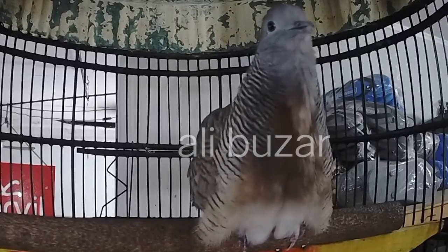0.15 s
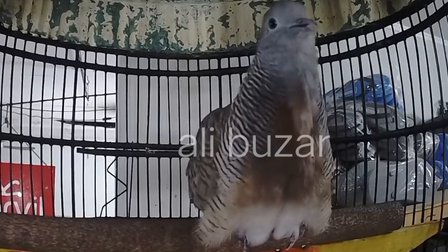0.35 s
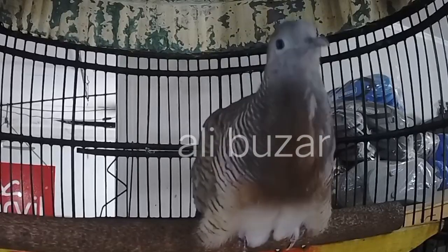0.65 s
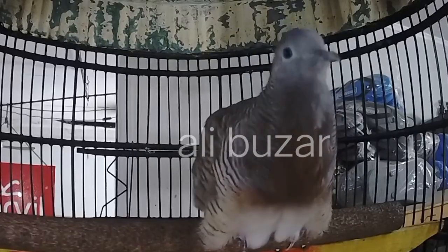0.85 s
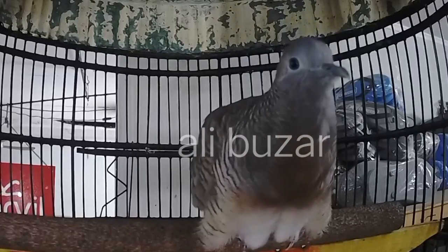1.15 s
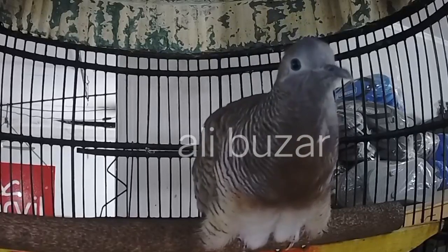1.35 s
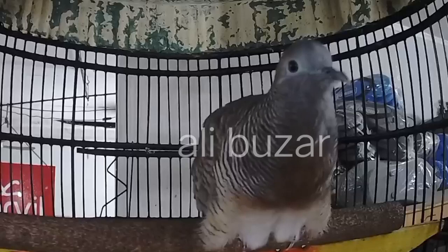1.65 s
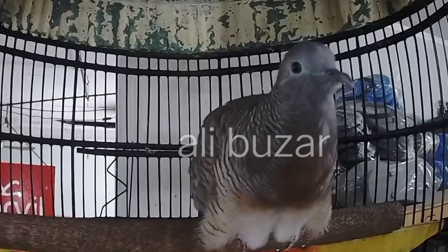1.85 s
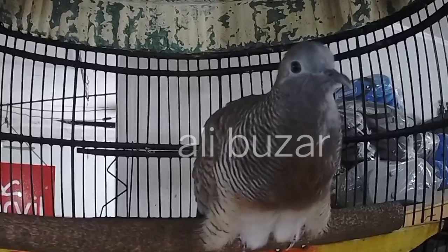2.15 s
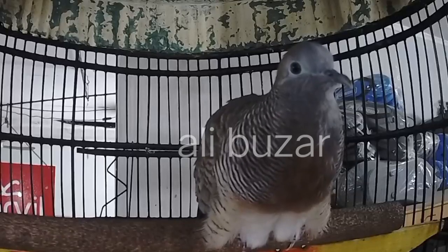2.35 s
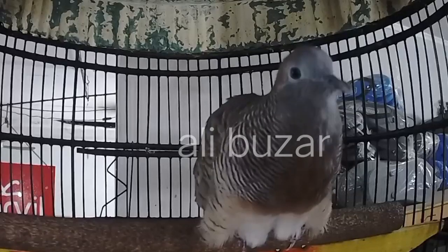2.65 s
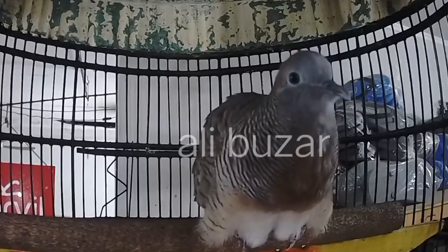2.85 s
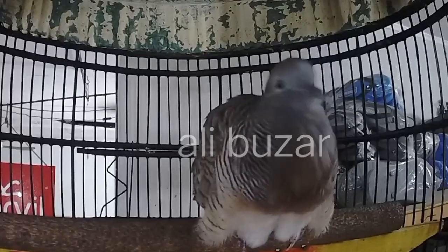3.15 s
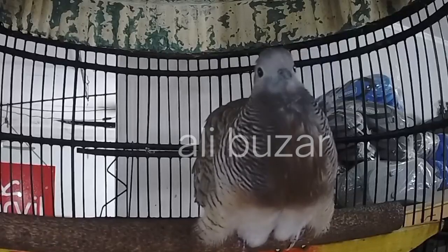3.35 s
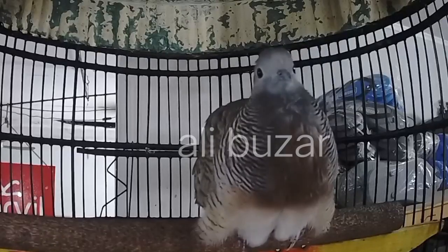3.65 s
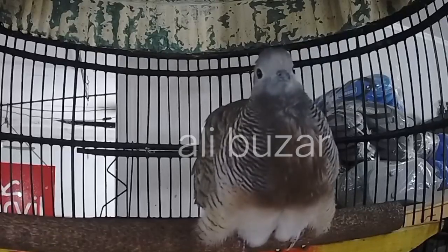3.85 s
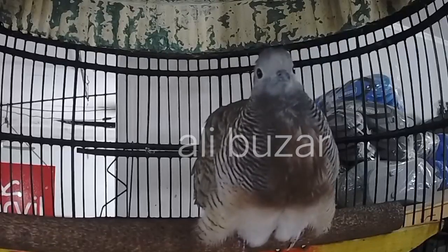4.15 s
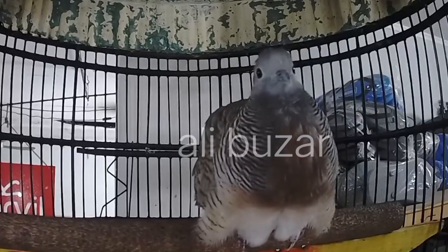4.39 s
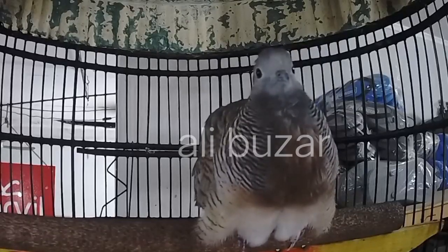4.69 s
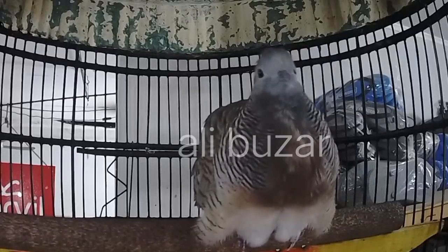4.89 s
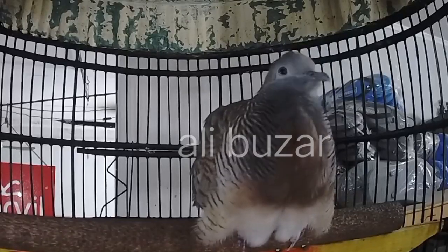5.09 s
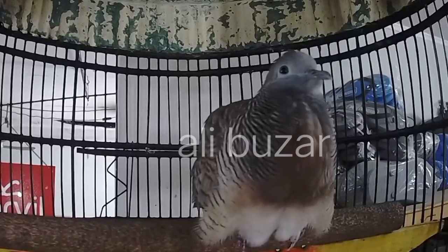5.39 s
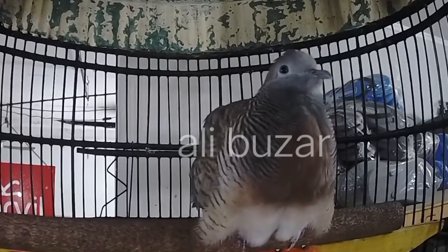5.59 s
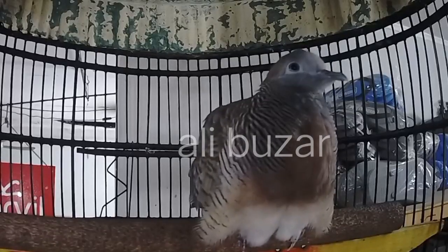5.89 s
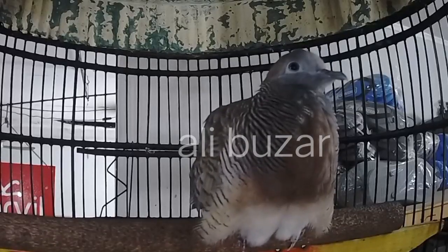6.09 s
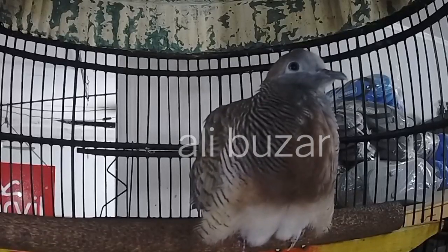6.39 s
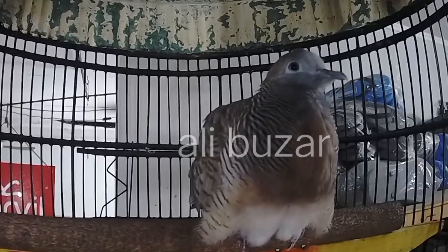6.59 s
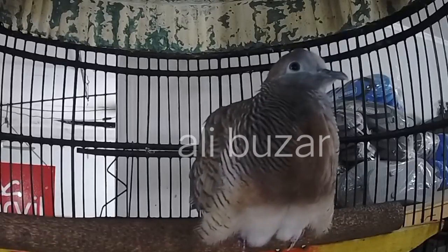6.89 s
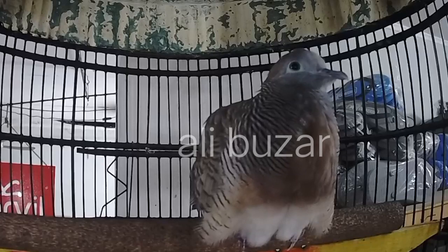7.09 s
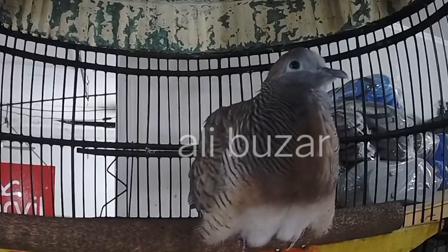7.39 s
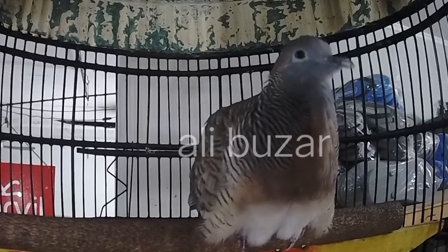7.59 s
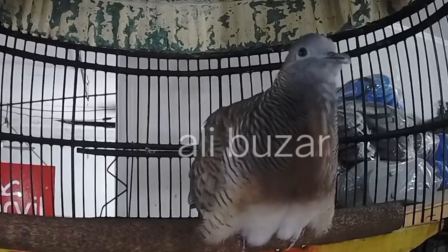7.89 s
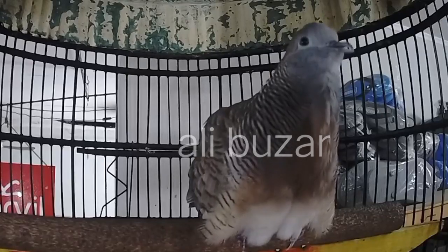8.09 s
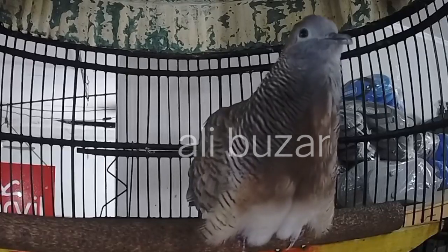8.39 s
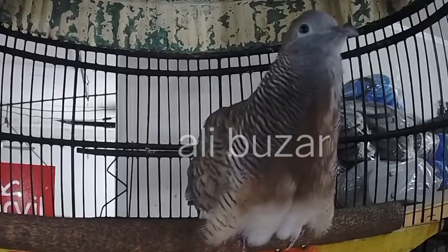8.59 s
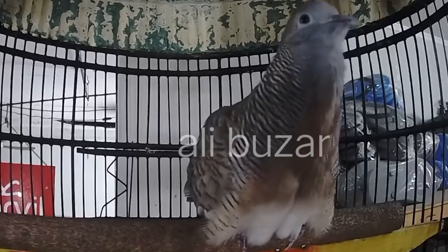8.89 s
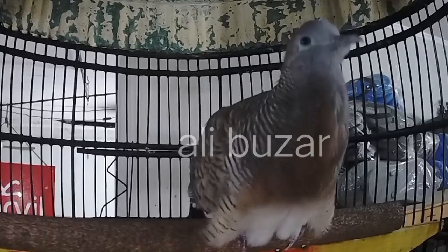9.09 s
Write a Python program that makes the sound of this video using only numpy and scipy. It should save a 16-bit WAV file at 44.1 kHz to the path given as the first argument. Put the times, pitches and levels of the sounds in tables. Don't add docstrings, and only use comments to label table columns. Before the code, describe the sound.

A caged dove coos close by in soft pure notes, neighbouring doves trill and call, over low traffic rumble and an engine pulling nearby.

```python
import sys
import numpy as np
from scipy import signal
from scipy.fft import rfft, irfft, next_fast_len
from scipy.io import wavfile
from scipy.ndimage import uniform_filter1d, map_coordinates

SR = 44100
rng = np.random.default_rng(int(sys.argv[2]) if len(sys.argv) > 2 else 0)


def output_pcm(signal):
    pcm = np.clip(np.atleast_2d(signal).T, -1, 1) * 32767
    wavfile.write(sys.argv[1], SR, np.round(pcm).astype(np.int16))


def volts(x):
    e = np.asarray(x, float) / 20
    return 10 ** e


N = 407475
T = np.arange(N) / SR


def unit(x):
    return x / np.sqrt(np.mean(x ** 2) + 1e-20)


def wobble(rate_hz, t=T):
    knots = rng.standard_normal(int(len(t) * rate_hz / SR) + 4)
    return map_coordinates(knots, [t * rate_hz])


def add(out, start_s, sound):
    first = round(start_s * SR)
    part = out[max(first, 0):][:len(sound) + min(first, 0)]
    sound = sound[max(-first, 0):]
    part += sound[:len(part)]


def tone(hz, db, overtones=(), bright_db=0, high_share=1):
    phase = 2 * np.pi * np.cumsum(hz) / SR
    wave = np.sin(phase)
    for k, gain_db in overtones:
        share = np.where((bright_db > 0) & (k > 3), high_share, 1)
        lift_db = bright_db / np.sqrt(k - 1) * share
        patchy_db = 2.5 * wobble(25, T[:len(phase)]) - 2.5
        wave = wave + volts(gain_db + lift_db + patchy_db) * np.sin(k * phase)
    return np.sqrt(2) * volts(db) * wave


def fade(t, length_s, attack_s, release_s):
    opening = np.clip(t / attack_s, 0, 1)
    closing = np.clip((length_s - t) / release_s, 0, 1)
    return np.sin(np.pi / 2 * opening * closing) ** 2


def catch(low_hz, high_hz, length_s, db):
    t = np.arange(round(length_s * SR)) / SR
    hz = low_hz + (high_hz - low_hz) * t / length_s
    second = tone(hz * rng.uniform(0.61, 0.88), db + 5.5)
    return (tone(hz, db) + second) * np.sin(np.pi * t / length_s)


def arches(notes, rise_s, dwell, dip, sag, overtones, throat, catch_db):
    out = np.zeros(N)
    centre_hz, width_hz, throat_db = throat
    last_end_s = 0
    for start_s, length_s, top_hz, db in notes:
        t = np.arange(round(length_s * SR)) / SR
        joined = start_s - last_end_s < .004
        climb = (dip - 0.15 * joined) * np.exp(-(t / rise_s) ** dwell)
        fall = sag * np.exp((t - length_s) / (0.0079 + 0.089 * length_s))
        hz = top_hz * (1 + sag / 8 - climb - fall)
        resonance = 1 / (1 + ((hz - centre_hz) / width_hz) ** 2)
        lift_db = throat_db * resonance * np.exp(-(t / (5.9 * rise_s)) ** 2)
        bright_db = 2.28 * lift_db - 90 * fall - 40 * climb
        note = tone(hz, db + lift_db - 22 * fall, overtones, bright_db, high_share=-.6)
        add(out, start_s, note * fade(t, length_s, attack_s=.0065, release_s=.010))
        add(out, start_s - .005, catch(1250, 1600, 0.0054, db + catch_db - 30 * joined))
        last_end_s = start_s + length_s
    return out


def echoes(x, t60_s, wall_s, wall_db, tail_db):
    t = np.arange(SR // 2) / SR
    tail = rng.standard_normal((2, len(t))) * volts(-60 * t / t60_s) * (t > .012)
    tail = volts(tail_db) * tail / np.linalg.norm(tail[0])
    tail[:, round(wall_s * SR)] += volts(wall_db)
    tail[1] = 0.83 * tail[0] + 0.1 * tail[1]
    return x + signal.fftconvolve(x[None], tail, axes=1)[:, :N]


def rush(spectrum, alike, patchy_db):
    z = signal.stft(rng.standard_normal((2, N + 512)), nperseg=512)[2]
    field = uniform_filter1d(rng.standard_normal(z.shape[1:]), size=6, axis=0)
    field = uniform_filter1d(field, size=10, axis=1)
    pair = signal.istft(z * volts(patchy_db * unit(field)), nperseg=512)[1]
    size = next_fast_len(N + 8192)
    hz, db = np.transpose(spectrum)
    colour = volts(np.interp(np.log(np.fft.rfftfreq(size, 1 / SR) + 1), np.log(hz + 1), db))
    turn = np.arccos(np.clip(alike, 0, 1)) / 2
    coloured = irfft(rfft(pair, size) * colour, size)[:, :N]
    mid, side = coloured * [[np.cos(turn)], [np.sin(turn)]]
    return unit(np.array([mid + side, mid - side]))


# (time [s], level [dB])
TRAFFIC_STRENGTH = [(0.0, -60), (0.79, -62.5), (1.34, -60), (2.21, -65), (2.68, -62), (3.22, -62),
                    (4.79, -55.5), (5.25, -51), (6.28, -54.5), (6.51, -56.5), (8.03, -57), (8.77, -52.5),
                    (9.24, -56)]
# (frequency [Hz], density [dB per Hz])
RUMBLE_SPECTRUM = [(20, -47.5), (33, -27.5), (50, -4.5), (119, -5.5), (214, -7), (330, -9), (400, -36.5),
                   (520, -46), (880, -120)]
TRAFFIC_SPECTRUM = [(210, -28), (350, -5.5), (764, -6.5), (853, -8.5), (1800, -22.5), (2340, -49),
                    (3960, -120)]
HISS_SPECTRUM = [(880, -30), (1500, -4), (2020, 1.5), (2400, 0.5), (3230, -10), (3860, -13), (5020, -42.5),
                 (8490, -120)]
RUSTLE_SPECTRUM = [(2500, -37), (4000, 2.5), (6500, -2.5), (9500, -5), (11000, -9), (13000, -14.5),
                   (15000, -23), (15400, -120)]
# (mean level [dB], growth with strength [dB per dB])
STREET_LAYERS = [
    (-33.5, .7),
    (-39, 0.46),
    (-52.5, 0.96),
    (-66, 0.61),
]
# (time [s], width [s], level [dB])
LEAF_GUSTS = [
    (.02, 0.22, 5),
    (3.78, 0.049, 8),
    (5.07, 0.048, 1.5),
    (8.9, .15, -1),
]


def street():
    strength_db = np.interp(T, *np.transpose(TRAFFIC_STRENGTH))
    swing_db = strength_db - strength_db.mean()
    rumble, traffic, hiss, rustle = (volts(db + grows * swing_db) for db, grows in STREET_LAYERS)
    gust_db = sum(db * np.exp(-((T - s) / width_s) ** 2) for s, width_s, db in LEAF_GUSTS)
    rumble = rumble * volts(1.6 * wobble(1.5))
    low = rumble * rush(RUMBLE_SPECTRUM, 0.99, patchy_db=1.0)
    low = low + traffic * rush(TRAFFIC_SPECTRUM, 1.0, patchy_db=2.0)
    hiss = hiss * volts(0.77 * gust_db)
    rustle = rustle * volts(gust_db + 1.5 * wobble(5.8) + [[-.8], [.8]])
    high = hiss * rush(HISS_SPECTRUM, 1.0, patchy_db=1.5)
    high = high + rustle * rush(RUSTLE_SPECTRUM, .1, patchy_db=0.5)
    return low + high + near_engine() + idle_engine()


# (time [s], firing rate [Hz], level [dB])
IDLE_RUN = [
    (0, 36.8, -34.5),
    (1.2, 37.39, -36.5),
    (2.3, 37.44, -36),
    (2.8, 36.17, -45.5),
]
# (multiple of firing rate, level [dB])
IDLE_HARMONICS = [(2, -10), (3, -15.5), (4, 4), (5, 2), (6, 1), (7, -9), (8, -5.5), (10, -15), (11, -17)]


def idle_engine():
    s, hz, db = np.transpose(IDLE_RUN)
    phase = 2 * np.pi * np.cumsum(np.interp(T, s, hz) * (1 + .004 * wobble(6))) / SR
    drone = np.zeros(N)
    for k, gain_db in IDLE_HARMONICS:
        drone += volts(gain_db + 3 * wobble(3)) * np.sin(k * phase + 2 * np.pi * rng.random())
    return unit(drone) * volts(np.interp(T, s, db, left=-90, right=-90))


def slide(start_s, length_s, from_hz, to_hz, db, peak):
    swell_db, die_db = 6, 15.5
    t = np.arange(round((length_s + .024) * SR)) / SR
    u = (t - .012) / length_s
    peak = np.clip(peak, .05, .95)
    curve_db = np.where(u < peak, swell_db / peak ** 2, die_db / (1 - peak) ** 2)
    level_db = db - curve_db * (u - peak) ** 2
    scoop = 1 - .05 * np.exp(-t / .012) + 0.0066 * wobble(40, t)
    hz = (from_hz + (to_hz - from_hz) * u) * scoop
    return start_s - .012, tone(hz, level_db) * fade(t, length_s + 0.019, attack_s=.022, release_s=0.025)


# (time [s], length [s], pitch [Hz], level [dB])
LEVEL_COOS = [(-.05, .13, 1145, -26.5), (-.01, 0.13, 949.5, -31), (0.106, 0.064, 893, -28),
              (.85, 0.046, 871, -23.5), (0.966, 0.092, 819, -28.5), (1.11, 0.15, 840, -22.5),
              (1.281, .06, 945, -28), (1.395, .05, 1058, -22.5), (2.12, 0.19, 1143, -32),
              (3.666, 0.072, 702, -38), (4.782, 0.056, 900, -24.5), (5.078, 0.05, 897, -24),
              (5.145, 0.038, 1065, -28), (5.255, 0.047, 893, -25), (6.35, 0.029, 946, -20),
              (6.49, 0.07, 862, -35), (6.716, 0.22, 898, -28.5), (8.97, 0.075, 870, -29.5),
              (9.1, 0.082, 860, -29), (9.203, 0.036, 882, -29.5)]
# (after [s], length [s], from [Hz], to [Hz], level [dB], loudest at [share])
QUESTION_NOTES = [
    (0, .11, 859.6, 978, -9.5, .65),
    (.06, .07, 1076, 1087, -12, .5),
    (.11, .09, 1058, 1015, -1.5, .45),
    (.19, .05, 1023, 1026, -11.5, .4),
]
# (time [s], pitch factor, level [dB])
QUESTION_STARTS = [
    (.68, 0.99, -18),
    (1.999, 0.98, -21.5),
    (6.31, 1.0, -22),
    (7.07, 1.0, -20),
    (8.769, 1.0, -19),
]
# (time [s], length [s], from [Hz], to [Hz], level [dB])
FAINT_WHISTLES = [
    (0.846, .13, 1934, 1915, -47),
    (1.203, 0.15, 1855, 1758, -38.5),
    (1.511, 0.28, 1708, 1750, -47.5),
    (1.885, .08, 1775, 1804, -51),
]
# (time [s], length [s], from [Hz], to [Hz], level [dB])
RISING_SLIDES = [
    (1.67, .16, 870, 921, -26.5),
    (4.53, .12, 871, 931, -27),
    (6.603, 0.088, 871, 897, -31),
]
# (after [s], pitch [Hz], level [dB])
ANSWER_ARCH = [
    (0, 814, -2),
    (.022, 854, 1),
    (.04, 1014, -2.5),
    (.11, 1020, 1.5),
    (.165, 968, -1),
    (.2, 900, -5.5),
    (.24, 820, -7),
]
# (after [s], length [s], from [Hz], to [Hz], level [dB], loudest at [share])
ANSWER_NOTES = [
    (.015, 0.092, 856, 864, -4, 0.13),
    (.21, .09, 925, 956, -8, .12),
    (.3, .11, 805, 815, -9.5, .2),
    (.44, .19, 843, 808.7, -2, 0.21),
]
# (time [s], pitch factor, level [dB])
ANSWER_STARTS = [
    (2.96, 0.99, -18),
    (5.825, 1.0, -17.5),
]


def far_birds():
    out = np.zeros(N)
    for s, length_s, hz, db in LEVEL_COOS:
        add(out, *slide(s, length_s, hz * (1 + 0.014), hz * (1 - 0.014), db, peak=.35))
    for phrase, starts in ((QUESTION_NOTES, QUESTION_STARTS), (ANSWER_NOTES, ANSWER_STARTS)):
        for s, factor, db in starts:
            for after_s, length_s, from_hz, to_hz, gain_db, peak in phrase:
                add(out, *slide(s + after_s, length_s, factor * from_hz, factor * to_hz, db + gain_db, peak))
    for row in FAINT_WHISTLES:
        add(out, *slide(*row, peak=0.13))
    for row in RISING_SLIDES:
        add(out, *slide(*row, peak=.7))
    after_s, arch_hz, arch_db = np.transpose(ANSWER_ARCH)
    t = np.arange(round((after_s[-1] + .024) * SR)) / SR
    for s, factor, db in ANSWER_STARTS:
        hz = factor * np.interp(t - .012, after_s, arch_hz)
        coo = tone(hz, db + np.interp(t - .012, after_s, arch_db))
        add(out, s - .012, coo * fade(t, t[-1], attack_s=0.066, release_s=0.029))
    flutter_db = 3.2 * wobble(55)
    return echoes(out * volts(flutter_db), t60_s=.42, wall_s=.045, wall_db=-18, tail_db=-8.5)


# (time [s], length [s], pitch [Hz], level [dB], slow climb [share])
NEAR_COOS = [
    (.553, 0.26, 742.6, -8, 0.036),
    (1.01, 0.11, 728, -8.5, 0.018),
    (1.256, .118, 722.6, -8.5, .01),
    (1.522, 0.14, 723, -8.5, 0.015),
    (1.822, 0.784, 712, -8.5, .01),
    (9.016, .33, 739.6, -8.5, 0.033),
]
# (multiple, level [dB])
NEAR_OVERTONES = [(2, -43.5), (3, -57.5), (4, -63), (5, -64), (6, -74), (8, -71.5)]
# (from [s], to [s], [(multiple, level [dB])])
HALF_ORDERS = (.725, .792, [(2.5, -46), (3, -48.5), (3.5, -51.5), (4, -51.5), (4.5, -56.5)])


def near_dove():
    sag_hz_per_s, sag_ends_s, climb_s = 105, 0.618, 0.033
    fade_db_per_s, tired_db, tires_s, tiring_s = 5.5, 3.2, .562, .008
    close_db_per_s, close_s = 752.5, 0.024
    doubling_from_s, doubling_to_s, half_overtones = HALF_ORDERS
    out = np.zeros(N)
    for start_s, length_s, hz, db, climb in NEAR_COOS:
        t = np.arange(round(length_s * SR)) / SR
        flick = 0.11 if length_s > .4 else -.09
        closing = np.exp((t - length_s) / 0.017) * flick
        scoop = 1 - 0.22 * np.exp(-t / .008) - 2 * climb * np.exp(-t / climb_s) + closing
        sagging_hz = hz - sag_hz_per_s * np.minimum(t - .06, sag_ends_s)
        pitch_hz = sagging_hz * scoop * (1 + 0.0033 * wobble(22, t))
        level_db = db - fade_db_per_s * t - tired_db / (1 + np.exp((tires_s - t) / tiring_s))
        shut_db = close_db_per_s * np.maximum(t - length_s + close_s * (length_s < .4), 0)
        level_db = level_db - uniform_filter1d(shut_db, size=300) + 0.35 * wobble(14, t)
        outside = (t + start_s < doubling_from_s) | (t + start_s > doubling_to_s)
        doubled = uniform_filter1d(volts(-60 * outside), size=400)
        halves = tone(pitch_hz, 0, half_overtones) - tone(pitch_hz, 0)
        bright_db = 17 * np.exp(-t / 0.024) - 27 * t
        note = tone(pitch_hz, 0, NEAR_OVERTONES, bright_db) + doubled * halves
        add(out, start_s, note * volts(level_db) * fade(t, length_s, attack_s=0.014, release_s=0.0077))
        lead_s = .012 if start_s < 1 else .004
        add(out, start_s - lead_s, catch(850, 1200, lead_s + .009, db=-24))
    return echoes(out, t60_s=0.09, wall_s=.047, wall_db=-29, tail_db=-11.5)


# (time [s], length [s], top pitch [Hz], level [dB])
FAR_TRILL_NOTES = [(1.15, 0.054, 1192, -20.5), (1.20, 0.05, 1140, -43), (1.25, .04, 1228, -26.5),
                   (1.29, 0.047, 1148, -28), (1.36, 0.052, 1160, -28), (1.45, 0.065, 1164, -25),
                   (1.57, 0.13, 1157, -29), (1.80, 0.13, 1155, -31), (4.45, 0.062, 1186, -23),
                   (4.50, 0.04, 1177, -24), (4.545, 0.04, 1206, -24.5), (4.59, .06, 1183, -24),
                   (4.655, 0.052, 1153, -24), (4.745, 0.057, 1133, -22), (4.855, 0.053, 1180, -21),
                   (4.985, 0.1, 1159, -21.5)]


def far_trill():
    dry = arches(FAR_TRILL_NOTES, rise_s=0.026, dwell=5.6, dip=0.2033, sag=.04, overtones=(),
                 throat=(950, 70, 3), catch_db=-31.5)
    flutter_db = 2.6 * wobble(80)
    return echoes(dry * volts(flutter_db - 2.5), t60_s=0.28, wall_s=0.031, wall_db=-10.5, tail_db=-0.5)


# (time [s], firing rate [Hz], load level [dB])
NEAR_RUN = [(2.299, 25.48, -48.5), (4.1, 25.05, -51.5), (4.7, 24.52, -39.5), (5.4, 24.63, -33.5),
            (5.75, 26.09, -34.5), (6.2, 25.46, -32), (7.298, 25.06, -27), (7.8, 26.12, -22.5),
            (8.3, 27.63, -25), (9.001, 29.58, -31.5), (9.15, 28.86, -43)]
# (multiple of firing rate, level [dB])
NEAR_WEAK_ORDERS = [(3, -12.5), (4, -15.5), (5, -5), (9, -20), (10, -12), (11, -22), (12, -10.5), (13, -17),
                    (17, -18)]
# (frequency [Hz], width [Hz], depth [dB])
PIPE_NOTCH = (164, 8.6, 9.3)


def near_engine():
    idle_sixth_db, pull_s, pull_ramp_s, pull_db = -42, 6.4, .8, 18
    s, hz, load_db = np.transpose(NEAR_RUN)
    hz, load_db = np.interp(T, s, hz), np.interp(T, s, load_db)
    phase = 2 * np.pi * np.cumsum(hz * (1 + .003 * wobble(6))) / SR
    dip_hz, width_hz, dip_db = PIPE_NOTCH
    pull = np.clip((T - pull_s) / pull_ramp_s, 0, 1) * np.clip((s[-1] - T) / (s[-1] - s[-2]), 0, 1)
    notch_db = dip_db / (1 + ((6 * hz - dip_hz) / width_hz) ** 2)
    sixth_db = idle_sixth_db + pull * (pull_db - notch_db)
    strong, weak = np.zeros(N), np.zeros(N)
    for k, db in ((7, load_db), (6, sixth_db)):
        strong += volts(db + 1.5 * wobble(5)) * np.sqrt(2) * np.sin(k * phase)
    for k, gain_db in NEAR_WEAK_ORDERS:
        weak += volts(gain_db + 4 * wobble(2.5)) * np.sin(k * phase + 2 * np.pi * rng.random())
    effort_db = -34 + .4 * (load_db + 34.0)
    return (strong + volts(effort_db + 2.5) * weak) * np.clip((T - s[0]) / 0.24, 0, 1)


# (time [s], level [dB])
OPENING_CATCHES = [
    (2.367, -27),
    (5.358, -30),
]
# (time [s], length [s], top pitch [Hz], level [dB])
TRILL_NOTES = [(2.390, .043, 1347, -20.5), (2.431, 0.044, 1366, -19.5), (2.467, .040, 1366, -19.5),
               (2.515, .035, 1360, -20.5), (2.570, .034, 1327, -21.5), (2.657, 0.04, 1325, -21.5),
               (2.756, .052, 1318, -20.5), (2.931, .115, 1290, -20.5), (5.378, 0.049, 1355, -20),
               (5.420, 0.038, 1393, -19), (5.455, .038, 1370, -18), (5.501, 0.039, 1346, -21),
               (5.556, 0.038, 1326, -22), (5.644, 0.042, 1316, -21.5), (5.747, 0.048, 1316, -21),
               (5.886, .120, 1289, -19.5)]
# (multiple, level [dB])
TRILL_HARMONICS = [(2, -37), (3, -45.5), (4, -60), (5, -50)]
# (frequency [Hz], width [Hz], lift [dB])
THROAT_RESONANCE = (1008, 85, 10)


def neighbour():
    dry = arches(TRILL_NOTES, rise_s=.0095, dwell=2.14, dip=.33, sag=0.22, overtones=TRILL_HARMONICS,
                 throat=THROAT_RESONANCE, catch_db=-11.5)
    for s, db in OPENING_CATCHES:
        add(dry, s, catch(1000, 1626, 0.024, db))
    return echoes(dry, t60_s=.25, wall_s=.05, wall_db=-21, tail_db=-21)


# (time [s], pitch [Hz], level [dB])
KNOCKS = [
    (6.684, 2110, -23.5),
]


def knocks():
    out, t = np.zeros(N), np.arange(600) / SR
    for s, hz, db in KNOCKS:
        onset = 1 - np.exp(-t / 0.00066)
        add(out, s, volts(db - 60 * t / 0.018) * np.sin(2 * np.pi * hz * t) * onset)
    return echoes(out, t60_s=0.16, wall_s=.045, wall_db=-10.0, tail_db=-2)


def scene():
    near = near_dove()
    loudness = uniform_filter1d(np.abs(near[0]), size=4000, origin=1200)
    ducking = 1 / (1 + 1.6 * loudness)
    yard = (neighbour() + far_trill() + far_birds() + knocks()) * volts([[.65], [-.65]])
    road = ducking * street() * volts([[.55], [-.55]])
    road = np.array([np.roll(road[0], 2), road[1]])
    return near * volts([[.9], [-.9]]) + yard + road


def band_limit(x):
    return signal.sosfilt(signal.butter(12, 15120, fs=SR, output="sos"), x)


def record(dry):
    return band_limit(dry)


dry = scene()
out = record(dry)
output_pcm(out)
```